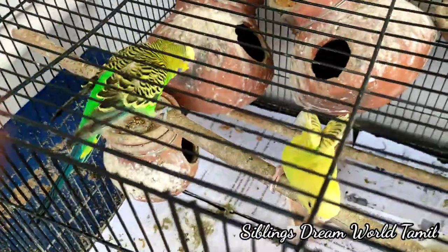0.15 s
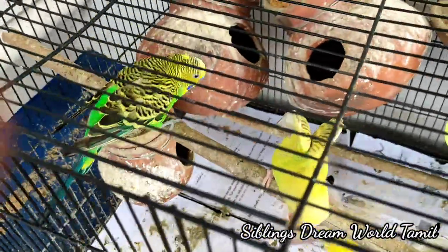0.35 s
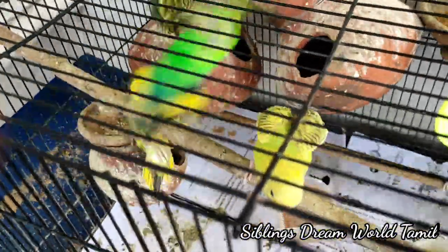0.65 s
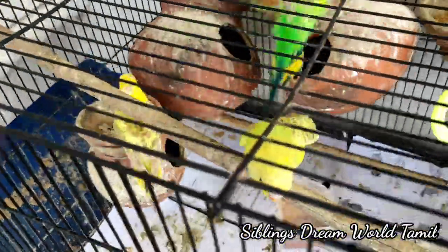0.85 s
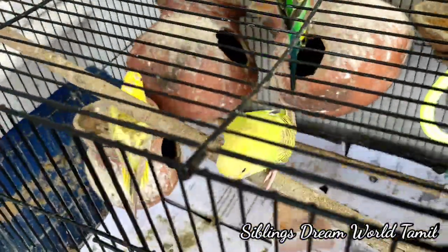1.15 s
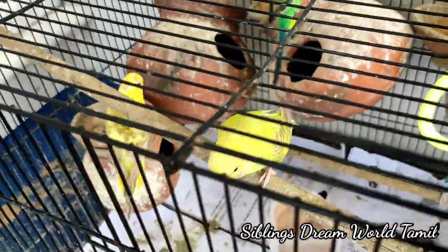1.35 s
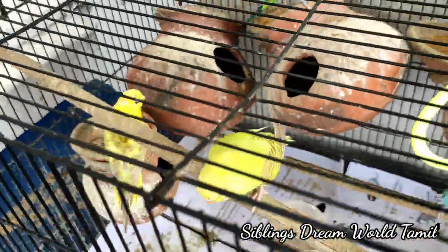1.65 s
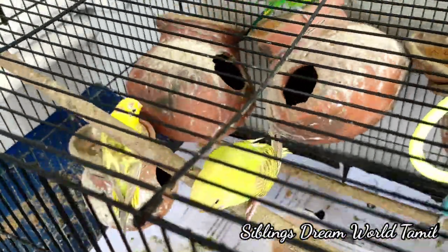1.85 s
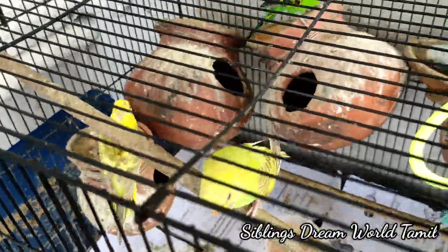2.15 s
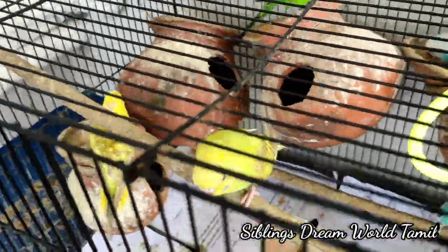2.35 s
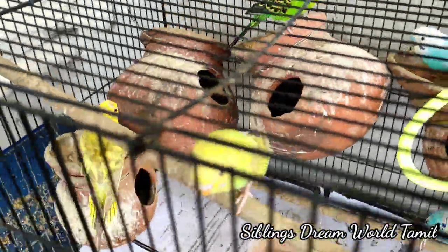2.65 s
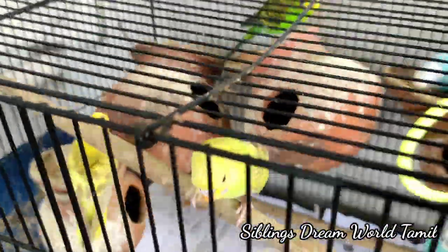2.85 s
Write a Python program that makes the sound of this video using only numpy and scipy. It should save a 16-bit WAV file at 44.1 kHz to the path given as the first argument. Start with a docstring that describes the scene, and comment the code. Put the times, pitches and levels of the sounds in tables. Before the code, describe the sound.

Budgerigar chirps open the scene: a close bird squeaks in fast, buzzing bursts until about 0.45 s, with a faint note near 0.57. Wings puff and feathers rustle, with knocks and tiny bright ticks around 0.6-1.0 s. A further bird warbles softly, lower, from 1.2 to 1.8. Cage wires knock hard at left around 1.9-2.2, again at 2.5 and loudest at 2.83, amid quieter closing chirps. Faint room air throughout.

```python
"""Budgerigars in a wire cage

In a small, live room, one close bird chirps, with high, buzzing strands above its notes, and another warbles
further off: gliding, buzzing tones. Wings flutter and feathers rustle (shaped noise) as the birds change perches,
with short bright bursts (brief noisy rings) in the flutter. Knocks on the cage wires beside the left microphone
arrive as quick downward sweeps, because treble travels faster along a wire. Behind it all lie a steady murmur
of air (noise) and a faint hum (a sine)."""
import sys
import numpy as np
from scipy import signal
from scipy.fft import rfft, irfft, next_fast_len
from scipy.io import wavfile
from scipy.ndimage import map_coordinates

SR = 44100
rng = np.random.default_rng(int(sys.argv[2]) if len(sys.argv) > 2 else 0)


def waveform_to_disk(signal):
    """Save audio, clipped to [-1, 1], as 16-bit WAV at the path in sys.argv[1]."""
    frames = np.transpose(np.atleast_2d(signal))
    scaled = np.clip(frames, -1, 1) * 32767
    samples = np.round(scaled).astype(np.int16)
    wavfile.write(sys.argv[1], SR, samples)


N = 132300  # length of the scene in samples (3 s)


def chirps():
    """Whistled and buzzing notes from the close bird, with overtones that its beak favours."""
    # the notes: t/s, length/s, start f/Hz, middle f/Hz, end f/Hz, level/dB, buzz as a share of the pitch
    chirp_notes = [(.086, 0.02, 2650, 2740, 2820, -21.5, 0.039), (.095, 0.013, 4340, 4100, 3800, -14, .02),
                   (.1, 0.026, 3693, 3114, 3060, -12.5, 0.053), (.128, 0.022, 3256, 3536, 3360, -18.5, .17),
                   (.153, 0.033, 2376, 2437, 2450, -13.5, 0.058),
                   (.165, 0.042, 3364, 3100, 2565, -18, 0.22),
                   (.202, 0.016, 2640, 3240, 3300, -12.5, 0.089),
                   (.313, 0.0158, 2724, 2894, 2490, -14, 0.057), (.337, 0.017, 3110, 3060, 3000, -9, 0.072),
                   (.355, 0.025, 3246, 3367, 3370, -9.5, 0.022),
                   (.381, 0.011, 2740, 3360, 3370, -18.5, 0.22),
                   (.396, 0.03, 2233, 2455, 2436, -15.5, 0.048),
                   (.421, 0.0054, 3140, 3180, 3200, -11, 0.045),
                   (.567, 0.012, 3230, 2890, 2540, -22.5, 0.059),
                   (2.796, 0.025, 2690, 2760, 2920, -27, 0.068),
                   (2.811, 0.037, 3300, 3696, 3665, -22, 0.049),
                   (2.849, .016, 3800, 3230, 2950, -16, 0.047), (2.862, 0.024, 2007, 2026, 2630, -30, .08),
                   (2.865, 0.013, 3590, 3670, 3430, -21.5, 0.15),
                   (2.878, 0.012, 3460, 3196, 3170, -17.5, .025),
                   (2.893, 0.014, 2680, 2850, 3000, -18, 0.047),
                   (2.908, 0.018, 2570, 2530, 2820, -24, 0.076),
                   (2.932, 0.02, 3000, 3200, 3180, -20.5, 0.044),
                   (2.957, 0.014, 3020, 3360, 3280, -21.5, 0.043),
                   (2.976, 0.029, 1960, 2210, 1970, -31, 0.11), (2.985, 0.016, 2920, 2860, 2900, -20, .02)]
    # strength of an overtone by its pitch: f/Hz, level against the note/dB
    chirp_overtones = [(6300, -23), (7300, -4), (8300, -14.5), (9500, -28.5), (11000, -28)]
    # the bird's place, positive to the left: t/s, left-right level/dB
    chirp_place = [(0, 6), (.6, 4), (2.8, 9), (3, 12)]
    voice, _ = syrinx(chirp_notes, buzz_hz=340, jitter=.35, jitter_hz=1300, overtones=chirp_overtones)
    return amp(1) * placed(voice, voice, curve(chirp_place), wet_db=-3)


def high_strands():
    """High, buzzing strands, several of them overtones of the close bird's chirps, with a little rasp of noise."""
    # the strands: t/s, length/s, start f/Hz, middle f/Hz, end f/Hz, level/dB, buzz as a share of the pitch
    strand_notes = [(0, .013, 7700, 7610, 7920, -4.5, 0.051), (.015, 0.056, 7980, 7110, 6810, -15, 0.072),
                    (.104, 0.051, 6605, 6740, 7670, -10.5, 0.059),
                    (.104, 0.021, 8700, 9450, 9200, -22, 0.052),
                    (.162, 0.012, 7180, 7680, 7660, -11.5, 0.027),
                    (.178, 0.03, 7700, 6800, 6280, -16, 0.105),
                    (.305, 0.0145, 4220, 5035, 5760, -15, 0.075),
                    (.564, .026, 6130, 5690, 5200, -21, 0.085),
                    (.569, 0.016, 8200, 8280, 7320, -24.5, 0.043)]
    # tone colour of the rasp: f/Hz, level/dB
    rasp_spectrum = [(1000, -10), (2000, -7), (3200, -1), (5600, 7.5), (7200, 9), (9300, 9), (11000, -0.5)]
    voice, effort = syrinx(strand_notes, buzz_hz=430, jitter=.4, jitter_hz=1500)
    rasp = amp(-6) * effort * noise(rasp_spectrum)[0]
    # the room receives more rasp than the direct path
    return placed(voice + rasp / 2, voice + rasp, side_db=-1.5, wet_db=0)


def warble():
    """The further bird's lower, softer chatter, made slightly reedy by overtones."""
    # the notes: t/s, length/s, start f/Hz, middle f/Hz, end f/Hz, level/dB, buzz as a share of the pitch
    warble_notes = [(1.185, 0.063, 1577, 1468, 1665, -33.5, .01),
                    (1.232, 0.089, 1694, 1838, 1596, -29.5, 0.038),
                    (1.325, 0.025, 1633, 1474, 960, -27, 0.092),
                    (1.495, 0.032, 2360, 1707, 1840, -31, 0.058),
                    (1.528, .017, 2070, 2274, 2150, -29.5, 0.02),
                    (1.525, 0.089, 1936, 1653, 1652, -30, 0.064),
                    (1.615, 0.033, 1640, 853, 1430, -35, 0.091),
                    (1.648, 0.0447, 1495, 1356, 1185, -33, 0.076),
                    (1.695, 0.051, 1393, 1495, 1300, -35, 0.064), (1.738, 0.041, 1294, 798, 1235, -39, .08),
                    (1.782, 0.047, 1660, 1400, 1580, -35, 0.074)]
    # strength of an overtone by its pitch: f/Hz, level against the note/dB
    warble_overtones = [(2000, 1), (2950, -6), (3700, -18), (4500, -14), (5400, -34)]
    voice, _ = syrinx(warble_notes, buzz_hz=190, jitter=.5, jitter_hz=900, overtones=warble_overtones)
    echoes = room(voice, early_db=-8, early_t60=.06)
    return voice * pan(6) + amp(-4) * echoes


def syrinx(notes, buzz_hz, jitter, jitter_hz, overtones=None):
    """The bird's voice organ: notes glide through three pitches while a fast, uneven buzz swings pitch and level.

    Returns the voice and its envelope."""
    voice, effort = np.zeros(N), np.zeros(N)
    uneven_hz = buzz_hz * (1 + .15 * wobble(90))
    swing = np.sin(2 * np.pi * np.cumsum(uneven_hz) / SR)
    tremble = jitter * wobble(jitter_hz)
    for s, length, start, middle, end, db, buzz in notes:
        t = np.arange(int(length * SR)) / SR
        u = t / length  # progress through the note, 0 to 1
        i = (np.arange(len(t)) + int(s * SR)) % N
        bend = (2 * middle - start - end) * 2 * u * (1 - u)  # carries the glide through the middle pitch
        hz = start + (end - start) * u + bend
        buzzing_hz = hz * (1 + buzz * (swing[i] + tremble[i]))
        phase = 2 * np.pi * np.cumsum(buzzing_hz) / SR
        fade = np.clip(np.minimum(t, length - t) / .003, 0, 1)  # 3 ms ramps at both ends
        envelope = amp(db + 25 * buzz * swing[i]) * fade
        tone = np.sin(phase)
        if overtones is not None:
            for k in range(2, 5):
                tone = tone + amp(along(overtones, k * hz)) * np.sin(k * phase)
        add(voice, s, np.sqrt(2) * envelope * tone)
        add(effort, s, envelope)
    return voice, effort


def knocks():
    """Each knock runs along a wire, treble first, with a brief rattle and the dull ring of the cage frame."""
    # the knocks: t/s, level/dB, treble lift or cut/dB
    knock_list = [(.326, -14, 10), (0.444, -21.5, 7), (0.594, -5.5, -45), (.625, -5.5, -29),
                  (0.871, -6.5, -46), (0.884, -7, -43), (.94, -10.5, -52), (1.011, -16, -15),
                  (1.8829, -12.5, -11.5), (1.9753, -5, -19), (1.9818, -14.5, -20), (2.013, -6.5, -21),
                  (2.0267, -4, -12.5), (2.0616, -2.5, -18.5), (2.209, -12, -19.5), (2.518, -13, -25),
                  (2.8263, 2, -18.5)]
    # tone colour of the wire: f/Hz, level/dB
    wire_colour = [(60, -36), (150, 0.5), (280, 3.5), (600, -1), (1300, 1.5), (3000, 0.5), (5000, -4.5),
                   (8500, -0.5), (14000, -23)]
    travel_s = .0026  # travel time at 1 kHz, longer for lower pitches
    frame_hz, frame_t60_s, frame_db = 280.5, 0.03, -39.5
    size = 4096
    hz, t = np.fft.rfftfreq(size, 1 / SR), np.arange(size) / SR
    travel = np.exp(-2j * np.pi * 2 * travel_s * np.sqrt(1000 * hz))  # delay shrinks as 1 / sqrt(hz)
    treble_share = along([(500, 0.05), (3000, 1)], hz)
    track = np.zeros(N)
    for s, db, treble_db in knock_list:
        rattle = amp(-22) * rng.standard_normal(size) * amp(-60 * t / .025)
        frame = amp(frame_db - 60 * t / frame_t60_s) * np.sin(2 * np.pi * frame_hz * t)
        contact = rattle + frame
        contact[0] += 1  # the blow itself is a single click
        colour = amp(along(wire_colour, hz) + treble_db * treble_share)
        add(track, s, amp(db + 15.5) * irfft(rfft(contact) * colour * travel))
    return track * pan(23.9) + amp(-5) * room(track, early_db=-3, early_t60=.09)


def bright_bursts():
    """Short bright bursts of flutter, and the sharp click of one wire knock: noisy rings that die at once."""
    # the bursts: t/s, level/dB, left-right level/dB
    burst_list = [(.724, -28.5, 0), (.806, -22, 14.5), (.964, -31, -0.5), (1.014, -22.5, -0.5),
                  (1.273, -21.5, 4), (1.421, -24.5, 3.5), (1.8846, -12, 19)]
    ring_hz, ring_t60_s, attack_s = 8550, 0.0025, 0.000066
    track, far = np.zeros((2, N)), np.zeros(N)
    t = np.arange(SR // 50) / SR
    for s, db, pan_db in burst_list:
        ring = np.sin(2 * np.pi * ring_hz * t) + 0.5 * rng.standard_normal(len(t))
        envelope = amp(db + 10.5 - 60 * t / ring_t60_s) * (1 - np.exp(-t / attack_s))
        ring = envelope * ring
        add(track, s, ring * pan(pan_db))
        add(far, s, ring * amp(-2 * pan_db))  # the further left, the less goes to the room
    return track + amp(9.0) * room(far, early_db=10, early_t60=0.022)


def wings():
    """Flurries of soft puffs: noise that swells gently with each wingbeat."""
    # the flurries: t/s, length/s, level/dB
    flurries = [(0.196, 0.343, -27.5), (0.541, 0.12, -30), (0.83, .16, -31)]
    # tone colour of the moving air: f/Hz, level/dB
    wing_spectrum = [(60, -1.5), (200, -11), (500, -5), (1200, -12.5), (3000, -22.5), (8000, -46)]
    beat_hz = 21.2
    track = np.zeros(N)
    for s, length, db in flurries:
        t = np.arange(int(length * SR)) / SR
        puffs = amp(db + 2.6 * np.sin(2 * np.pi * beat_hz * t))
        swell = np.sqrt(abs(np.sin(np.pi * t / length)))
        add(track, s, puffs * swell)
    return track * noise(wing_spectrum) * pan(1.3)


def feathers():
    """A fine rustle of plumage: noise made grainy by fast and slower random swings in level."""
    # how strongly the feathers rustle: t/s, level/dB
    rustle_level = [(0, -15.5), (.3, -25), (.5, -23.5), (.6, -20), (.68, -40), (.73, -28), (.78, -33),
                    (1.02, -31.5), (1.13, -39.5), (1.27, -32), (1.4, -34), (1.87, -38), (2.34, -40.5),
                    (2.45, -26.5), (2.53, -30.5), (2.68, -41.5), (2.8, -29), (3, -33.5)]
    # tone colour of the rustle: f/Hz, level/dB
    plumage_spectrum = [(880, -12), (1500, -7.5), (2840, -7), (4180, -11), (5430, -8), (8650, 2),
                        (10800, -14), (15200, -19.5)]
    grain = unit(amp(0.43 * wobble(400) + 3.15 * wobble(39.8)))
    return amp(curve(rustle_level)) * grain * noise(plumage_spectrum) * pan(0.57)


def murmur():
    """The room's murmur of air: almost steady noise, strongest in the bass."""
    # tone colour of the air: f/Hz, level/dB
    air_spectrum = [(20, 6), (59, 4), (132, -3), (486, -7.5), (900, -13.5), (1560, -18), (3680, -23.5),
                    (5430, -32), (7370, -13.5), (9460, -48), (15200, -80)]
    return amp(-34.5 + 0.2 * wobble(5.65)) * noise(air_spectrum) * pan(4.15)


def faint_hum():
    """A 490 Hz sine whose level and phase drift at random."""
    phase = 2 * np.pi * 490 * np.arange(N) / SR + wobble(8)
    return amp(-45 + 3.3 * wobble(0.95)) * np.sin(phase)


def placed(direct, scattered, side_db, wet_db):
    """A bird in the room: the nearer it is to the left microphone, the drier it sounds."""
    echoes = room(scattered * amp(-side_db / 2), early_db=-5, early_t60=.04)
    return direct * pan(side_db) + amp(wet_db) * echoes


def room(x, early_db, early_t60):
    """Dense early echoes from the cage and pots plus the room's tail, as noise that dies away."""
    # how long the tail takes to fall by 60 dB: f/Hz, time/s
    tail_times = [(200, 0.033), (2500, 0.54), (8000, 0.34), (14000, 0.022)]
    hz, t, z = signal.stft(rng.standard_normal((2, SR // 2)), SR, nperseg=256)
    late = amp(-60 * t / along(tail_times, hz)[:, None])
    early = amp(early_db - 60 * t / early_t60)
    tail = signal.istft(z * (late + early), SR, nperseg=256)[1]
    tail = tail / np.linalg.norm(tail[0])
    tail = np.pad(tail, ((0, 0), (SR // 700, 0)))  # echoes start about 1.4 ms late
    return signal.fftconvolve(x[None], tail, axes=1)[:, :N]


def noise(spectrum):
    """Stereo noise of rms 1, alike in the bass and almost unrelated in the treble."""
    # how alike left and right are, 1 being identical: f/Hz, likeness
    likeness = [(30, 1), (150, 0.88), (500, 0.68), (1500, 0.062), (6000, 0.022)]

    def response(hz):
        turn = np.arccos(np.clip(along(likeness, hz), -1, 1)) / 2
        return amp(along(spectrum, hz)) * [np.cos(turn), np.sin(turn)]

    mid, side = filtered(rng.standard_normal((2, N)), response)
    return unit(np.array([mid + side, mid - side]))


def amp(db):
    """Decibels to gain."""
    return 10 ** (np.asarray(db) / 20)


def unit(x):
    """Scale to rms 1."""
    return x / np.sqrt(np.mean(x ** 2) + 1e-20)


def along(points, hz):
    """Read a value at hz from (f/Hz, value) points on a log axis."""
    f, v = np.transpose(points)
    return np.interp(np.log(hz + 1), np.log(f + 1), v)


def curve(points):
    """Turn (t/s, value) points into one value per sample."""
    return np.interp(np.arange(N) / SR, *np.transpose(points))


def wobble(rate):
    """A smooth random curve with rate knots a second."""
    knots = rng.standard_normal(N // 8)
    return map_coordinates(knots, [np.arange(N) * rate / SR], mode='wrap')


def filtered(x, response):
    """Shape the spectrum of x by a function of frequency."""
    m = next_fast_len(N + SR // 2)
    return irfft(rfft(x, m) * response(np.fft.rfftfreq(m, 1 / SR)), m)[..., :N]


def pan(db):
    """Left and right gains for a level difference, positive to the left."""
    return amp(np.array([[.5], [-.5]]) * db)


def add(track, s, x):
    """Mix x into the track at time s in seconds."""
    i = int(np.clip(round(s * SR), 0, N - 1))
    track[..., i:i + x.shape[-1]] += x[..., :N - i]


def scene():
    """Birds and cage over air and hum, all reaching the left microphone slightly before the right."""
    voices = chirps() + high_strands() + warble()
    movement = knocks() + bright_bursts() + wings() + feathers()
    background = murmur() + faint_hum()
    lead_s = 0.00011
    sides = np.array([[1], [-1]])  # left early by half the lead, right late by half
    return filtered(voices + movement + background, lambda hz: np.exp(1j * np.pi * hz * lead_s * sides))


def record(dry):
    """The two microphones dull the treble unequally, the loudest peaks clip, and the band ends steeply."""
    # difference between the microphones, the right one duller at the top: f/Hz, left-right level/dB
    mic_difference = [(5500, 1), (7200, -5.5), (8900, 9.5), (14000, 0.5)]
    top_hz = 15400

    def colour(hz):
        treble = along([(9500, -3), (11000, -10.5), (15000, -8.5)], hz)
        return amp(treble) * pan(along(mic_difference, hz))

    clipped = np.clip(filtered(dry, colour), -1, 1)
    return filtered(clipped, lambda hz: hz < top_hz)


dry = scene()
out = record(dry)
waveform_to_disk(out)
```